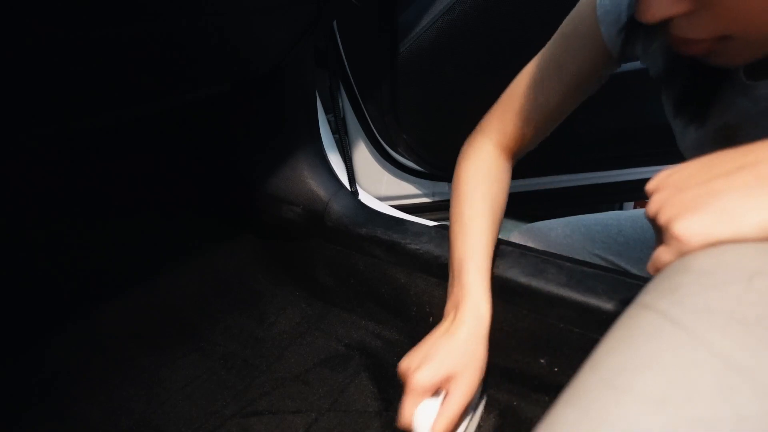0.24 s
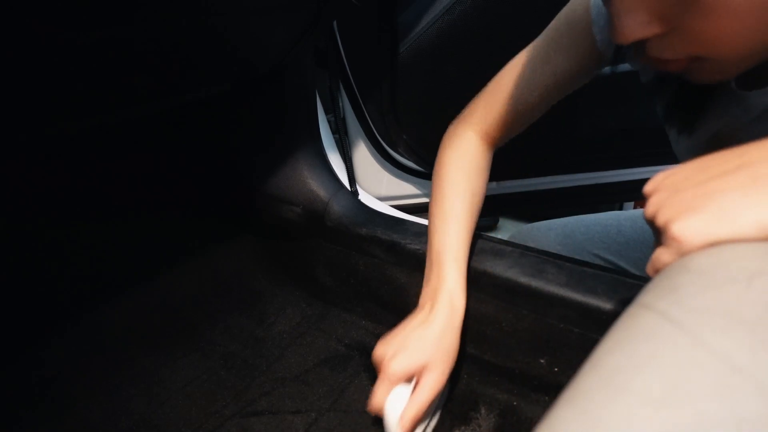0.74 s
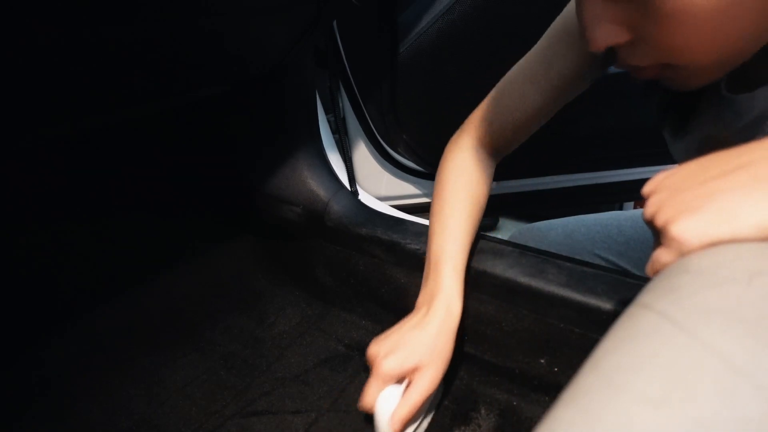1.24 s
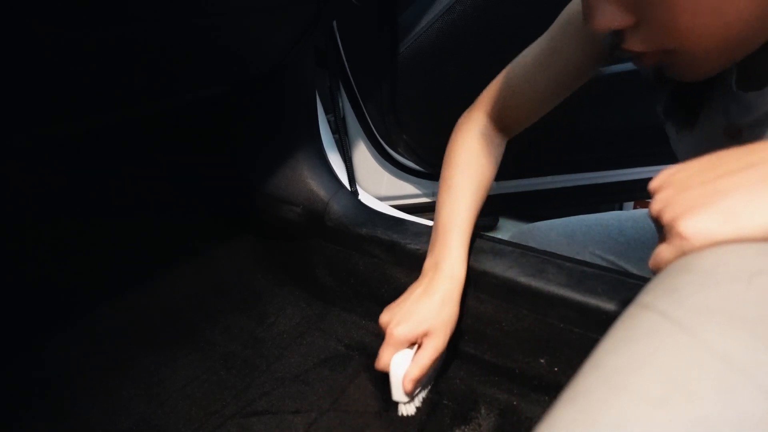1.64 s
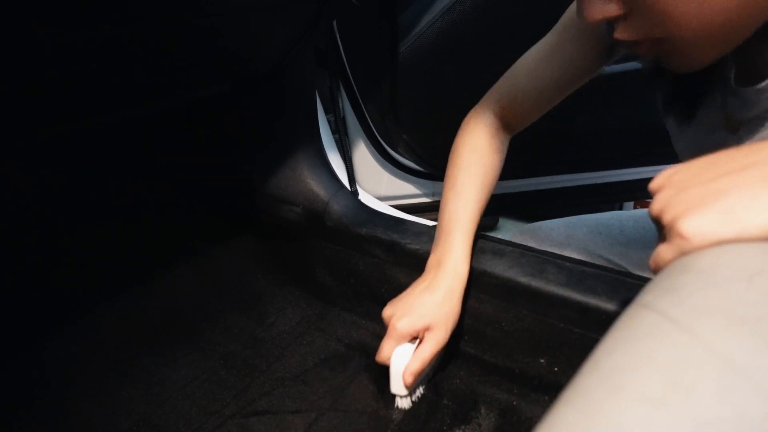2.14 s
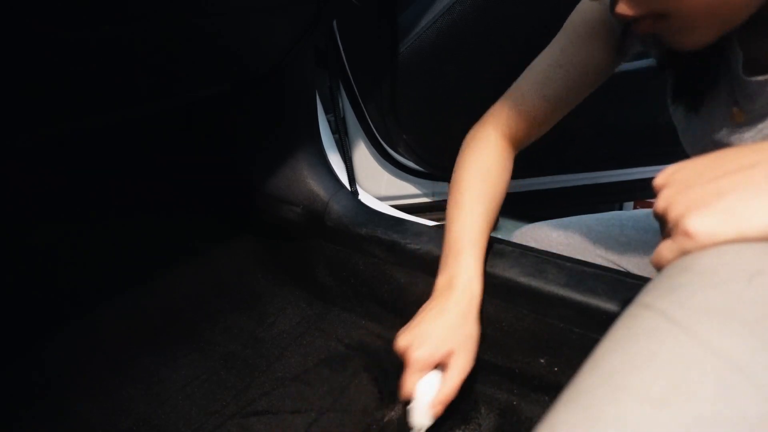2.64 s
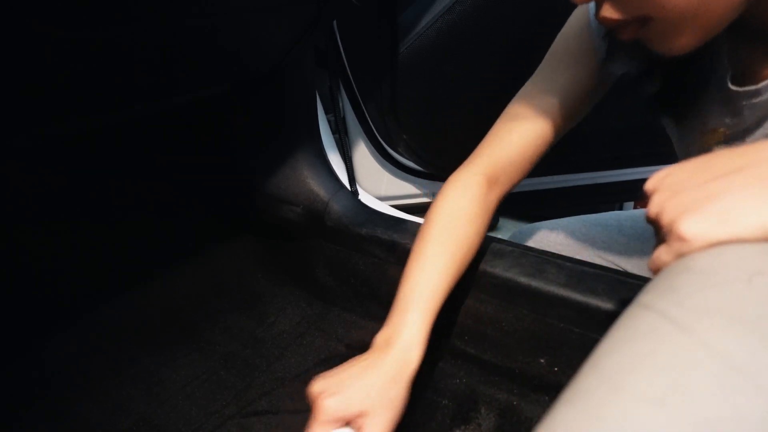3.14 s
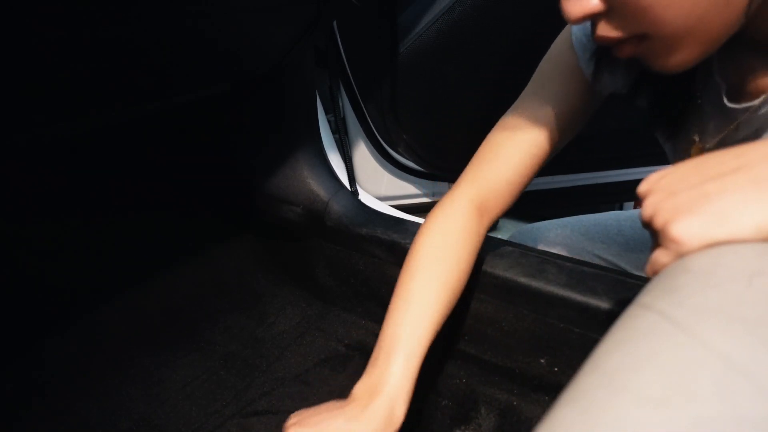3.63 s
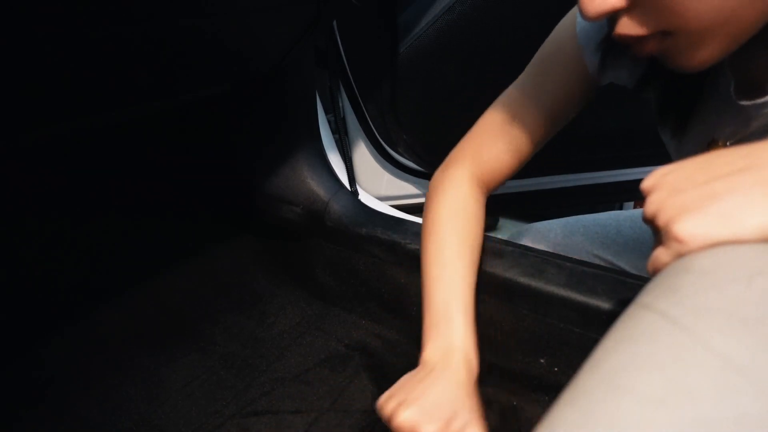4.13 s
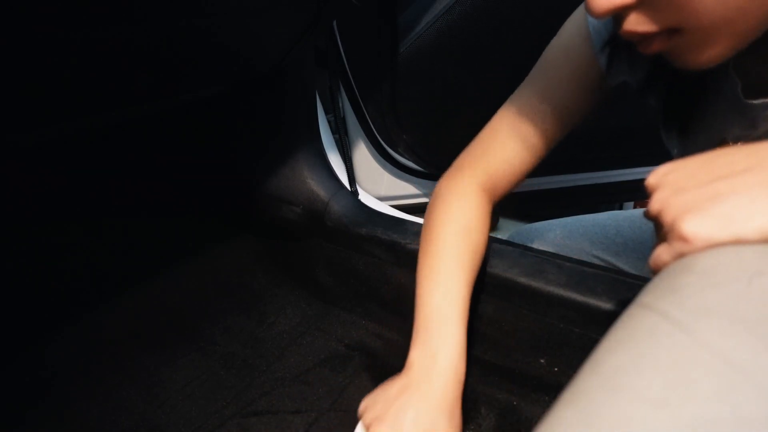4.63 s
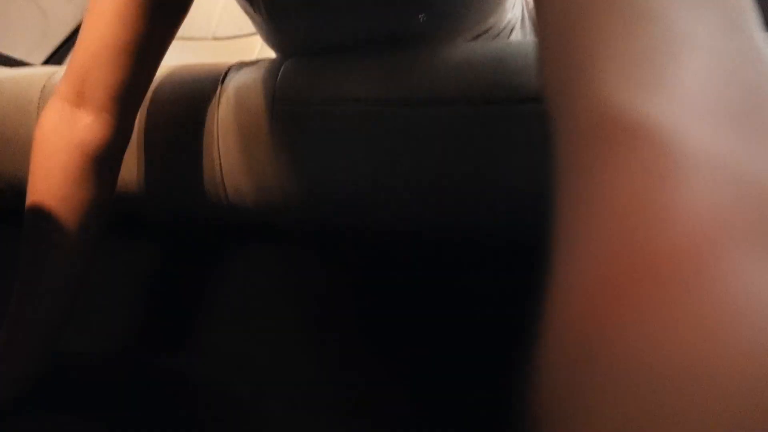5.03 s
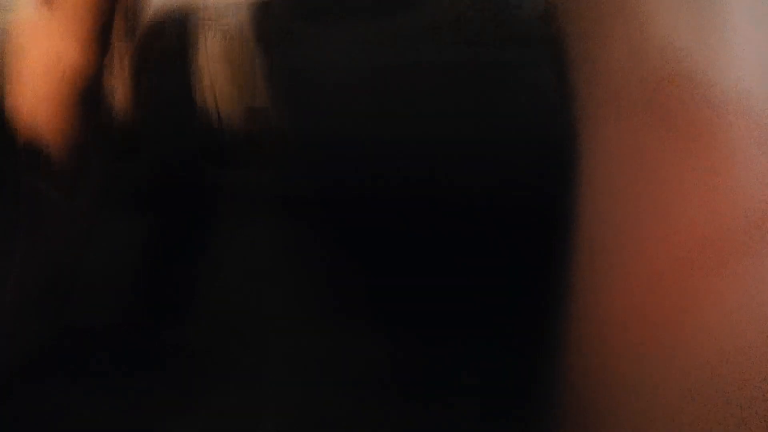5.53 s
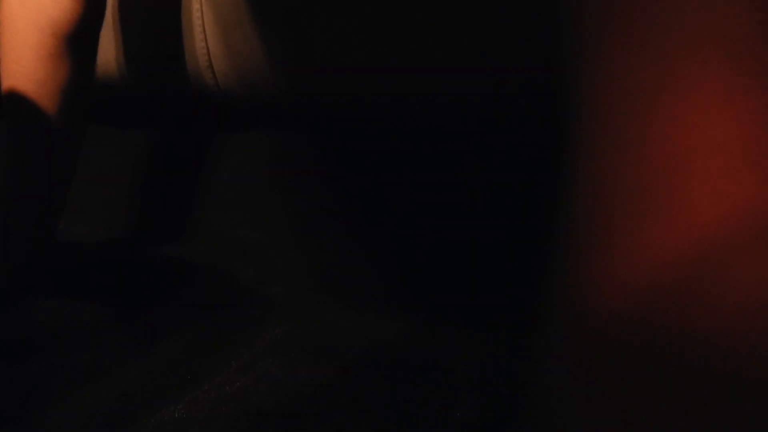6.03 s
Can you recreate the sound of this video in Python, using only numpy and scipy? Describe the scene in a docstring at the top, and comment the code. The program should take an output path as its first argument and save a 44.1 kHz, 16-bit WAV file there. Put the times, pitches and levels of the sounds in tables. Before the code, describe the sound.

From the start, a stiff hand brush scrubs back and forth on a car's floor carpet, about four strokes a second. The sound is close and dry in the padded cabin, with scratchy bristles on top and a hollow drumming from the floor, over quiet garage air. After about 2 seconds the strokes gradually slow, and the brush bumps the floor with a low thump near 2.7 seconds. A longer last stroke begins around 4.5 seconds and rasps as it eases. Just after 5 seconds the scrubbing cuts off, and a very faint low hum and soft, rapid low ticking set in. A dull knock on trim comes at 5.1 seconds, then a louder one at about 5.55, with a hard plastic crack and quick rebounds. Each leaves a soft, fading wash of noise. The hum and ticking continue to the end, at about 6.3 seconds.

```python
"""A stiff hand brush scrubs back and forth on the carpet of a car floor, over the quiet air of a garage.
Its sound is stick-slip friction: thousands of bristles catch in the pile and snap free, ringing the
brush and drumming on the floor pan inside the padded cabin. After five seconds the scrubbing sound cuts
off, and a low hum and a faint low ticking set in. Something knocks twice, each impact a thud of trim
and a crack of hard plastic with quick rebounds, trailed by a soft wash of noise that dies away."""
import sys
import numpy as np
from scipy import signal
from scipy.io import wavfile
from scipy.ndimage import uniform_filter1d

SR = 44100
rng = np.random.default_rng(int(sys.argv[2]) if len(sys.argv) > 2 else 0)


def wav_out(sig):
    """Save sig, one row per channel (or a flat mono array), as 16-bit PCM at SR to the path in sys.argv[1]."""
    wavfile.write(sys.argv[1], SR, np.round(np.clip(np.atleast_2d(sig).T, -1, 1) * 32767).astype(np.int16))


N = 276493

# Strokes: the hand turns, creeps, the bristles bite, the stroke holds, then eases into the next turn.
# turn t/s; durations of creep/s, bite/s, hold/s; level/dB at the turn, after creep, after bite, after
# hold; relative to that level: floor pan/dB, its swell over the hold/dB, tips/dB, flex/dB, hollow/dB
STROKES = [ (0.0, 0.032, 0.031, 0.12, -51.5, -40.5, -32, -32.5, -3, 1.5, -6.5, -25, -13.5),
           (0.243, 0.023, 0.025, 0.14, -48.5, -38, -29, -28, -7, 0, -10, -28.5, -10.5),
           (0.492, 0.039, 0.037, 0.12, -52.5, -42.5, -32, -31, -2.5, 4, -8.5, -26, -12.5),
           (0.739, 0.034, 0.036, 0.13, -50.5, -37.5, -24, -27, -7.5, 3.5, -11, -28.5, -13),
           (0.991, 0.045, 0.031, 0.1, -50, -39.5, -30.5, -29, -5.5, 2, -10, -23, -14),
           (1.246, 0.031, 0.023, 0.13, -50, -36.5, -25.5, -25, -7, 3.5, -11, -33.5, -10.5),
           (1.494, 0.042, .034, 0.11, -51, -39.5, -31, -30, -4.5, 5, -9.5, -27.5, -13.5),
           (1.727, .05, 0.035, 0.13, -51, -37, -24, -28.5, -7, 4.5, -13, -25.5, -11.5),
           (1.983, 0.087, 0.047, 0.062, -42.5, -36.5, -31.5, -33, -2.5, 1, -9, -28.5, -14),
           (2.224, 0.074, 0.015, 0.16, -53, -35.5, -26, -25.5, -6, 1.5, -11.5, -27, -13.5),
           (2.529, 0.09, 0.044, 0.072, -52, -39.5, -34, -34, -3.5, -1, -10.5, -22, -13),
           (2.814, 0.09, 0.028, 0.17, -49.5, -35.5, -28.5, -30.5, -7.5, 0.5, -10.5, -35, -12),
           (3.173, 0.061, 0.041, 0.082, -52, -45, -35.5, -33.5, -5.5, 1, -11.5, -24, -11.5),
           (3.425, 0.051, 0.035, 0.21, -56.5, -38.5, -29.5, -28, -7, 0.5, -12, -33, -14.5),
           (3.824, 0.056, 0.054, 0.11, -58, -45.5, -34.5, -33.5, -6.5, -1, -11.5, -26, -11.5),
           (4.143, 0.057, 0.049, .17, -55, -39.5, -31.5, -31.5, -5.5, -0.5, -12, -30, -12),
           (4.511, 0.022, 0.097, 0.29, -59, -56.5, -33.5, -28, -4, 2, -9, -24.5, -10.5), ]
# Snags in the pile, brief jumps or dips of level: t/s, gain/dB, half width/s
SNAGS = [(2.05, -4.5, 0.014), (2.636, 5.5, 0.0071), (2.652, -8, 0.0062), (3.1, 3, 0.019),
         (3.275, 3.5, 0.008), (4.82, 1, .02)]
# Friction spectrum of bristles on carpet: f/Hz, spectral level/dB
FRICTION_SPECTRUM = [(24, -59.5), (40, -32.5), (69, -24), (101, -5.5), (184, -2), (475, -1.5), (783, -9.5),
                     (932, -9), (1170, -6.5), (1320, -7), (1460, -9), (2800, -8), (4850, -8), (10000, -12),
                     (15700, -25)]
# Resonances of brush and footwell: f/Hz, bandwidth/Hz, lift/dB
RESONANCES = [(266, 23, 2.5), (384, 19, 3), (470, 58, 6), (624, 41, 4.5), (925, 64, 4), (1182, 80, -6),
              (1445, 20, -2), (2516, 68, -4.5), (1690, 32, 1.5), (1328, 44, 6.5), (1336, 32, -3.5),
              (1525, 54, 2.5), (1795, 36, 4), (2027, 32, 4), (2562, 87, 6.5), (2820, 40, 5), (3290, 60, 2),
              (3400, 44, 1), (3603, 68, 5.5), (3870, 54, 3), (4100, 34, 2), (4880, 120, 1.5)]
# Stereo width of the brush: f/Hz, side relative to centre/dB
BRUSH_WIDTH = [(60, -30), (150, -27), (380, -25.5), (950, -14.5), (2380, -14), (5980, -10.5), (15000, -5.5)]
# Balance of the brush: f/Hz, left minus right/dB
BRUSH_LEAN = [(60, 0.5), (950, 0.06), (3770, 0.05), (15000, 1.2)]
# Quiet air of the garage: f/Hz, spectral level/dB
AIR_SPECTRUM = [(15, -43), (40, -22), (64, -22), (100, -16.5), (283, -15.5), (435, -7.5), (570, -6.5),
                (878, -18.5), (1060, -18), (1700, -23), (3120, -30.5), (6000, -33), (15700, -44)]
# Likeness of the air at the two ears: f/Hz, correlation
AIR_CORRELATION = [(60, 1), (180, 0.57), (550, 0.43), (1650, 0.26), (4970, .44), (15000, .42)]
# Balance of the air: f/Hz, left minus right/dB
AIR_LEAN = [(60, -4), (240, -2), (950, 2), (3770, -1.5), (15000, -0.5)]
# Tail of the knocks, a soft wash of noise that is high at each knock and dies away: t/s, gain/dB
KNOCK_WASH = [(5.08, 4), (5.2, 2), (5.46, -1.5), (5.6, 6.5), (5.76, 5), (5.93, 4), (6.05, -1)]
# Bumps of the brush back on the floor pan: t/s, level/dB, f/Hz
BUMPS = [(2.656, -29, 178), (2.668, -26, 116)]
# Louder pips soon after the scrubbing sound cuts off: t/s, level/dB, f/Hz
LOUD_PIPS = [(5.085, -46, 438), (5.094, -44, 420), (5.102, -43, 460), (5.179, -46, 427), (5.202, -42, 485),
             (5.638, -46, 560)]
# Pips that nearly drop out: t/s
FAINT_PIPS = [5.434, 5.501, 6.169, 6.203]
# Contacts of the knocks and their rebounds:
# t/s, crack level/dB, thud level/dB, thud pitch ratio, crack tilt/(dB/octave), left minus right/dB
CONTACTS = [(5.1187, -42.5, -21.5, 1.01, 1.5, 3.5), (5.1295, -49, -56, 1.6, -4, 5),
            (5.15, -62, -38.5, 0.8, -3, -4), (5.5486, -27, -20.5, 1.1, -11, 7),
            (5.552, -21.5, -22, 0.83, -3.5, 2), (5.5563, -24, -20, 0.96, -3.5, -7.5),
            (5.563, -27, -31, 1.01, -3, 9), (5.585, -26, -33.5, 1.1, -11, 11.5),
            (5.594, -33, -33.5, 1.02, -4, -8), (5.606, -41, -38, 1.08, -10, -1.1),
            (5.6468, -49, -38.5, 1.25, -12, 5)]
# Modes of the hollow trim: f/Hz, level/dB, T60/s
TRIM_MODES = [(422, 0, 0.031), (654, -13.5, 0.071), (850, -30, 0.026), (219, -12.5, 0.041),
              (126, -22.5, 0.067)]
# Crack of hard plastic: f/Hz, spectral level/dB
CRACK_SPECTRUM = [(300, -30), (900, -0.5), (1500, -0.5), (2450, 4.5), (3300, 2.5), (4500, 1), (7000, -8.5),
                  (15000, -29)]

# For the bands (floor pan, bristle tips, bass flex, hollow mids): rms of the random wander, and the
# share of the lost level that each keeps while the hand is slow, before and after the hold
WANDER_DB = (2.45, 0.97, 4, 2)
SHARE_RISING, SHARE_EASING = (-0.24, -0.01, .4, 0.028), (.2, 0.045, 0.52, 0.21)


def amp(db):
    """Amplitude ratio of a level in decibels."""
    return 10 ** (np.asarray(db) / 20)


def unit_rms(x):
    """A signal scaled to unit mean power."""
    return x / np.sqrt(np.mean(x ** 2) + 1e-20)


def curve(points, hz):
    """A spectrum table interpolated on a logarithmic frequency axis."""
    f, value = np.transpose(points)
    return np.interp(np.log(hz + 1), np.log(f + 1), value)


def add(mix, start_s, sound, lean_db=0):
    """Superposition: a sound joins the mix, placed by the level difference between the ears."""
    part = mix[:, max(round(start_s * SR), 0):][:, :len(sound)]
    part += np.outer(amp([lean_db / 2, -lean_db / 2]), sound[:part.shape[1]])


def highpass(x, hz, order=2):
    """Butterworth attenuation below a cutoff."""
    return signal.sosfilt(signal.butter(order, hz, "high", fs=SR, output="sos"), x)


def minimum_phase(gain_db):
    """Causal response for gains from 0 to SR/2: phase follows from log gain by the Hilbert transform."""
    log_gain = np.log(amp(np.maximum(np.r_[gain_db, gain_db[-2:0:-1]], -100)))
    return np.fft.ifft(np.exp(np.conj(signal.hilbert(log_gain)))).real[:len(gain_db)]


def hand(cutoff_s=5.064, cutoff_db=-43.5, arch_db=0.4, rasp_db=10):
    """Friction noise follows hand speed: times, overall level and four relative band levels."""
    t = np.arange(0, N / SR, .001)
    rows = np.array(STROKES)
    stroke = np.clip(np.searchsorted(rows[:, 0], t, "right") - 1, 0, None)
    turn, creep, bite, hold, turn_db, creep_db, bite_db, held_db = rows[stroke, :8].T
    pan_db, swell_db, tips_db, flex_db, hollow_db = rows[stroke, 8:].T
    end = np.r_[rows[1:, 0], cutoff_s][stroke]
    end_db = np.r_[rows[1:, 4], cutoff_db][stroke]
    # progress through each phase, from 0 to 1
    crept = np.clip((t - turn) / creep, 0, 1)
    bitten = np.clip((t - turn - creep) / bite, 0, 1)
    held = np.clip((t - turn - creep - bite) / hold, 0, 1)
    ease_from = turn + creep + bite + hold
    eased = np.clip((t - ease_from) / np.maximum(end - ease_from, .01), 0, 1)
    # the creep starts fast, the hold arches, the easing starts slowly
    rising_db = (turn_db - creep_db) * (1 - crept ** 0.54) + (creep_db - bite_db) * (1 - bitten)
    holding_db = bite_db + (held_db - bite_db) * held + arch_db * np.sin(np.pi * held)
    easing_db = (end_db - held_db) * eased ** 1.83
    snag_db = sum(db * np.exp(-((t - s) / width) ** 2) for s, db, width in SNAGS)
    level_db = np.where(t < cutoff_s, rising_db + holding_db + easing_db + snag_db, -120)
    pan_db += swell_db * (held - .5)
    hollow_db += rasp_db * np.sqrt(eased) * (stroke == len(rows) - 1)  # the last stroke rasps as it eases
    wander = uniform_filter1d(rng.standard_normal((len(t), 4)), size=40, axis=0)  # 40 ms average
    bands_db = np.array([pan_db, tips_db, flex_db, hollow_db]) + (WANDER_DB * unit_rms(wander)).T
    bands_db -= np.outer(SHARE_RISING, rising_db) + np.outer(SHARE_EASING, easing_db)
    return t, level_db, bands_db


def bristle_slips(per_s=26000):
    """Stick-slip: bristle tips catch in the pile and snap free at random; a few snap harder."""
    size = amp(1.2 * np.minimum(rng.exponential(1, N), 4)) * rng.standard_normal(N)
    return unit_rms(size * (rng.random(N) < per_s / SR))


def brush(patch_db=2.4):
    """Source and filter: slips scaled by hand speed excite the resonances of brush and footwell."""
    hand_t, level_db, bands_db = hand()
    speed = amp(np.interp(np.arange(N) / SR, hand_t, level_db))
    slips = np.array([bristle_slips(), bristle_slips()]) * speed
    hz, t, spectra = signal.stft(slips, SR, nperseg=512, noverlap=384)
    fine_hz = np.fft.rfftfreq(8192, 1 / SR)
    lift_db = sum(db / (1 + (2 * (fine_hz - f) / width) ** 2) for f, width, db in RESONANCES)
    colour_db = curve(FRICTION_SPECTRUM, fine_hz) + lift_db
    power = amp(2 * colour_db)
    mid_power = power[(fine_hz > 1200) & (fine_hz < 7000)].sum()
    flex = 1 / (1 + (fine_hz / 165) ** 8)
    pan = 1 / (1 + (fine_hz / 690) ** 12) - flex
    hollow = 1 / (1 + (fine_hz / 1170) ** 16) - pan - flex
    tips = 1 / (1 + (7500 / (fine_hz + 1)) ** 5)
    # pressure drives the floor pan, sharpness the treble, each against its usual share of the power
    shape_db = 0
    for band, band_db in zip((pan, tips, flex, hollow), bands_db):
        usual_db = 10 * np.log10((band * power).sum() / mid_power)
        excess_db = np.clip(np.interp(t, hand_t, band_db) - usual_db, -25, 25)
        shape_db += np.outer(np.interp(hz, fine_hz, band), excess_db)
    # the colour drifts in patches as the brush travels over the pile and through the footwell
    patches = rng.standard_normal((len(t), len(hz))).T
    patches = uniform_filter1d(patches, size=2, axis=0)
    patches = unit_rms(uniform_filter1d(patches, size=30, axis=1))
    centre, side = spectra * amp(shape_db + patch_db * patches)
    side *= amp(curve(BRUSH_WIDTH, hz))[:, None]
    lean = amp(curve(BRUSH_LEAN, hz) / 2)[:, None]
    ears = [(centre + side) * lean, (centre - side) / lean]
    rub = signal.istft(ears, SR, nperseg=512, noverlap=384)[1]
    body = minimum_phase(colour_db - 10 * np.log10(mid_power / len(fine_hz)))
    return signal.oaconvolve(rub, body[None])[:, :N]


def cabin(x, t60, width):
    """Reverberation: dense reflections off seats and trim, differing between the ears above the bass."""
    t = np.arange(6000) / SR
    centre, side = rng.standard_normal((2, 6000)) * amp(-60 * t / t60) * (t > .0015)
    side = width * highpass(side, 300)
    response = np.array([centre + side, centre - side]) / np.linalg.norm(centre)
    return signal.fftconvolve(x, response, axes=1)[:, :N]


def air_and_knock_wash(rms_db=-59.5):
    """Partly correlated noise: quiet garage air, and a soft wash that dies away after each knock."""
    frames, hz = N // 256 + 5, np.fft.rfftfreq(1024, 1 / SR)
    t = (np.arange(frames) * 256 - 512) / SR
    noise = rng.standard_normal((frames, len(hz), 4)).T
    left, independent = noise[::2] + 1j * noise[1::2]
    correlation = curve(AIR_CORRELATION, hz)[:, None]
    right = correlation * left + np.sqrt(1 - correlation ** 2) * independent
    lean = amp(curve(AIR_LEAN, hz) / 2)[:, None]
    wash_band = 1 / (1 + (300 / (hz + 1)) ** 4) / (1 + (hz / 5000) ** 4)
    wash_db = np.outer(wash_band, np.interp(t, *np.transpose(KNOCK_WASH)))
    spectra = np.array([left * lean, right / lean]) * amp(curve(AIR_SPECTRUM, hz)[:, None] + wash_db)
    out = signal.istft(spectra, nperseg=1024, noverlap=768)[1][:, :N]
    return amp(rms_db) * unit_rms(out)


def floor_bumps(rise_s=0.0018, t60=0.078):
    """Damped free vibration: the floor pan rings low where the back of the brush bumps it."""
    out, t = np.zeros((2, N)), np.arange(6000) / SR
    for start_s, db, hz in BUMPS:
        envelope = amp(db - 60 * t / t60) * (1 - np.exp(-t / rise_s))
        add(out, start_s, envelope * np.sin(2 * np.pi * hz * t))
    return out


def hum(hz=64.6, peak_db=-71, start_s=5.07):
    """Simple harmonic motion: a low pure tone that sets in after five seconds."""
    t = np.arange(N) / SR
    fade_in = np.clip((t - start_s) / .03, 0, 1)
    return amp(peak_db) * fade_in * np.sin(2 * np.pi * hz * t)


def ticking(start_s=5.2335, period_s=.03342, half_width_s=0.0038):
    """A nearly periodic train of tone bursts: each pip lasts a few cycles, so it is heard as a tick."""
    out, t = np.zeros((2, N)), np.arange(900) / SR
    beats = np.arange(start_s, N / SR, period_s)
    scatter = rng.standard_normal((len(beats), 3)).T
    faint = abs(beats[:, None] - FAINT_PIPS).min(1) < period_s / 2
    times_s = beats + .0012 * scatter[0]
    levels_db = -49 + 1.3 * scatter[1] - 9 * faint
    pitches_hz = 520 + 48 * scatter[2]
    pips = np.r_[np.c_[times_s, levels_db, pitches_hz], LOUD_PIPS]
    envelope = np.exp(-(t / half_width_s - 1.1) ** 2) * (1 - np.exp(-t / 0.00088))
    for (s, db, hz), phase in zip(pips, rng.random(len(pips))):
        add(out, s, amp(db) * envelope * np.sin(2 * np.pi * (hz * t + phase)), lean_db=-5)
    return out


def plastic_crack(tilt_db, rise_s=0.00032, decay_s=0.0029):
    """A broadband transient: tiny fractures and slips at the contact die in milliseconds; peak 1."""
    t, hz = np.arange(4000) / SR, np.fft.rfftfreq(512, 1 / SR)
    burst = rng.standard_normal(len(t)) * np.exp(-t / decay_s) * (1 - np.exp(-t / rise_s))
    colour_db = curve(CRACK_SPECTRUM, hz) + tilt_db * np.log2((hz + 500) / 2500)
    out = np.convolve(burst, minimum_phase(colour_db))[:len(t)]
    return out / abs(out).max()


def trim_thud(pitch, rise_s=0.0019):
    """Modal vibration: a soft blow rings the damped modes of the trim; peak 1."""
    t = np.arange(4000) / SR
    out = np.zeros(len(t))
    for hz, db, t60 in TRIM_MODES:
        struck_db = db + 2 * rng.standard_normal()
        out += amp(struck_db - 60 * t / t60) * np.sin(2 * np.pi * hz * pitch * t)
    out *= 1 - np.exp(-t / rise_s)
    return out / abs(out).max()


def knocks():
    """Impact and rebound: each contact cracks and thuds; so small a source radiates little deep bass."""
    out = np.zeros((2, N))
    for start_s, crack_db, thud_db, pitch, tilt_db, lean_db in CONTACTS:
        contact = amp(crack_db) * plastic_crack(tilt_db) + amp(thud_db) * trim_thud(pitch)
        add(out, start_s, contact, lean_db)
    return highpass(out, 90, order=3)


def scene():
    """Sound pressures add: brush and knocks with their reflections, ticking, air, wash and hum."""
    scrub = brush() + floor_bumps()
    hits = knocks()
    scrub_echo = amp(-22) * cabin(scrub, t60=.03, width=.5)
    hits_echo = amp(-10) * cabin(hits, t60=0.13, width=1.0)
    return scrub + scrub_echo + hits + hits_echo + ticking() + air_and_knock_wash() + hum()


def record(dry, low_hz=42, high_hz=15850, ceiling=.5):
    """Band limiting and saturation: a low cut, soft rounding of the tallest peaks, a steep high cut."""
    rounded = ceiling * np.tanh(highpass(dry, low_hz) / ceiling)
    lowpass = signal.firwin(801, high_hz, window=("kaiser", 11), fs=SR)
    return signal.oaconvolve(rounded, lowpass[None], "same")


dry = scene()
out = record(dry)
wav_out(out)
```